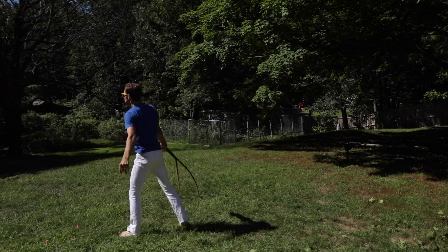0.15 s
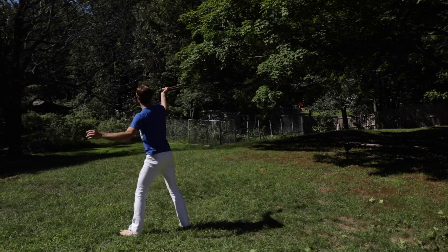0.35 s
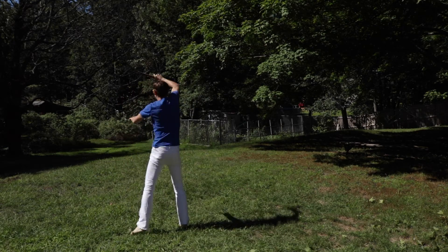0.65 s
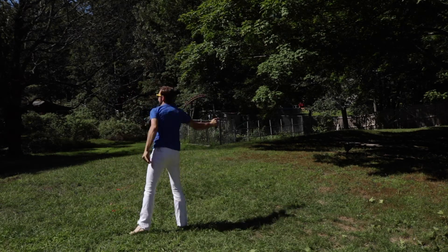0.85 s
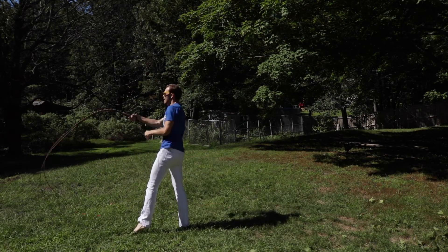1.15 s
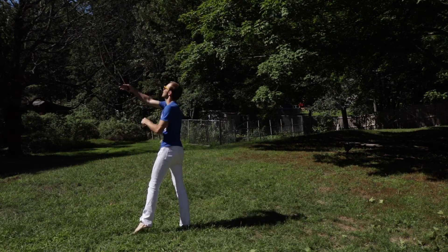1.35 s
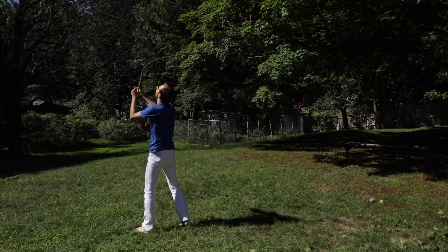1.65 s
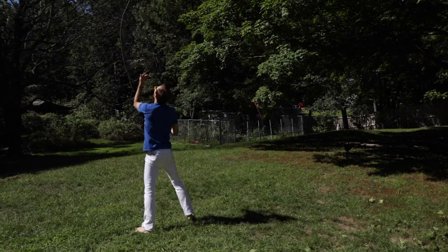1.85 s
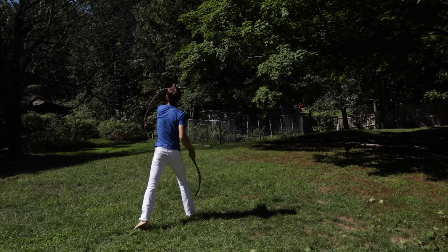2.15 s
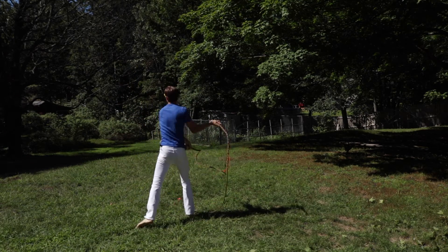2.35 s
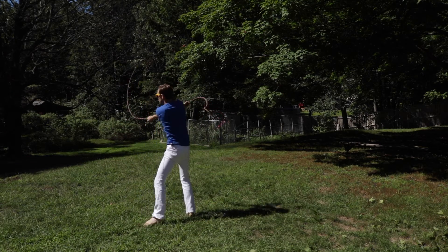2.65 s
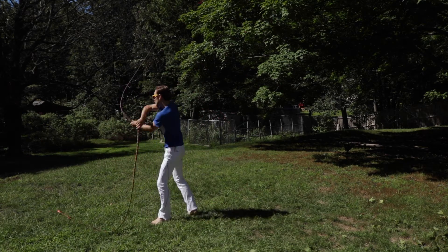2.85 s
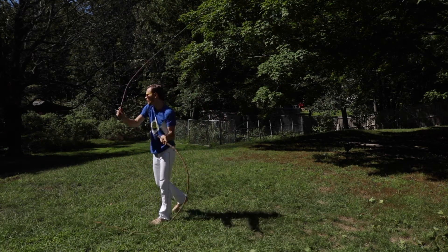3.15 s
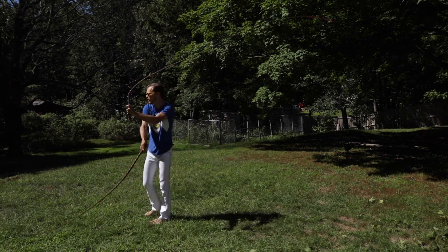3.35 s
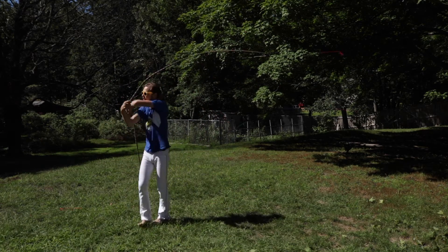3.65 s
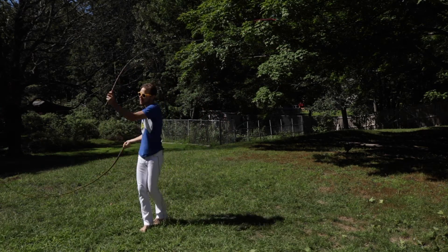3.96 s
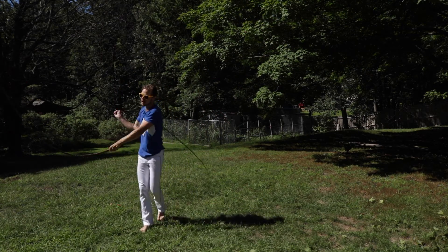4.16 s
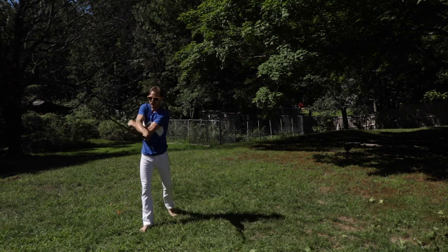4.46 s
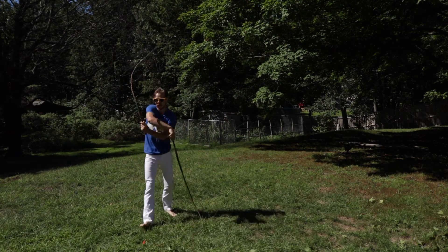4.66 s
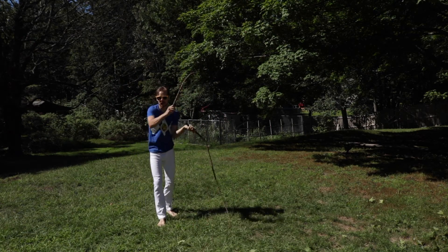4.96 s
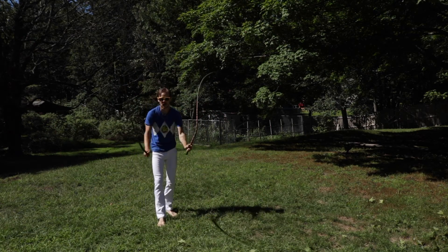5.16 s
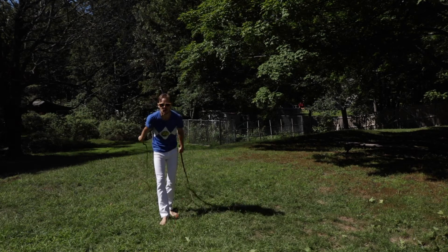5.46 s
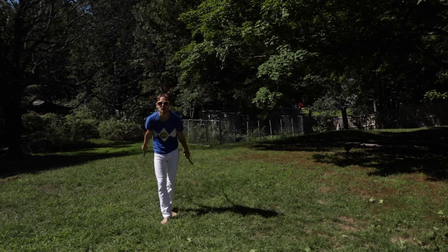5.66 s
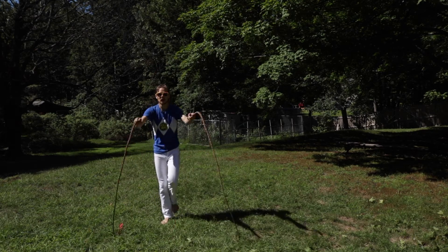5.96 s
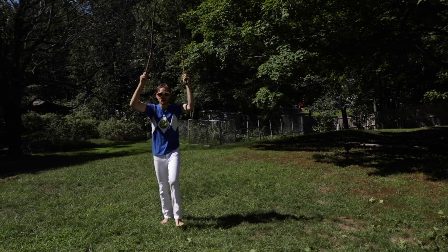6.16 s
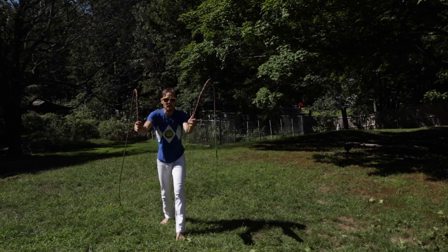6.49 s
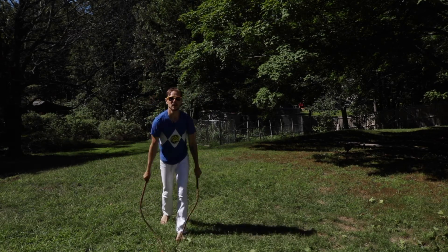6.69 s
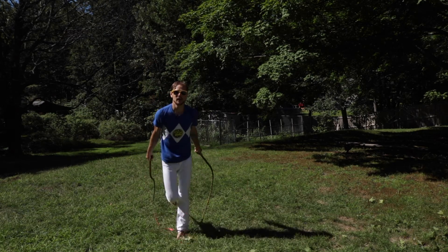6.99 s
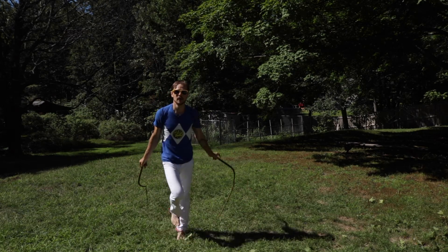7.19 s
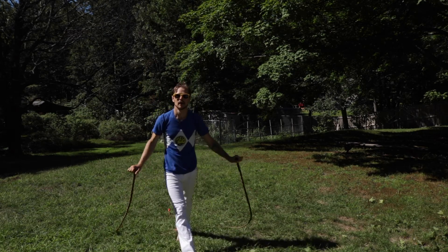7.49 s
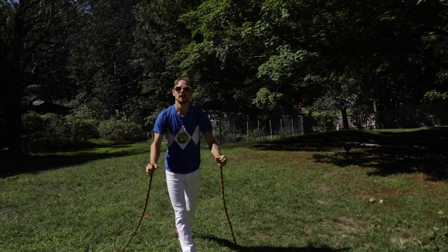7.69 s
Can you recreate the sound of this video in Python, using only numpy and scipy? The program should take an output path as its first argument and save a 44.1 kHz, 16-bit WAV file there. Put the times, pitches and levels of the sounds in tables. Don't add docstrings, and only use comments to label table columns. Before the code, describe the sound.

Outdoors on a grassy clearing edged with trees, faint distant traffic, a wavering low engine hum and thin insect hiss run throughout. At 0.0 s a leather whip cracks like a gunshot, overloading the microphone, with dense bright echoes scattering back from the wood. Faint whistling at 0.75 s leads to a second similar crack at 1.0 s, its roll fading over the next second. From 2.4 to 6.2 s the thongs give brief breathy, pitched swishes, with feet and leather rustling in grass. Dull thuds and snappy slaps fall at about 2.5, 2.8, 3.3, 3.4, 4.0, 4.3, 4.6 and 5.0 s; the sharpest pair is at 5.3 and 5.36 s, softer ones at 5.6 and 6.0. At 6.6 s comes the loudest crack, a weaker one right behind it, rolling through the trees. After 6.75 s bass vanishes and the thin echo fades to quiet field by 7.8 s.

```python
import sys
import numpy as np
from scipy import signal
from scipy.fft import rfft, irfft, next_fast_len
from scipy.io import wavfile
from scipy.ndimage import uniform_filter1d, map_coordinates

SR = 44100
rng = np.random.default_rng(int(sys.argv[2]) if len(sys.argv) > 2 else 0)


def wav_record(signal):
    frames = np.transpose(np.atleast_2d(signal))
    bounded = np.clip(frames, -1, 1)
    quanta = np.round(bounded * 32767).astype(np.int16)
    wavfile.write(sys.argv[1], SR, quanta)


def amplitude_ratio(level_db):
    exponent = np.asarray(level_db, float) / 20
    return 10 ** exponent


N = 345303


def unit(x):
    return x / np.sqrt(np.mean(x ** 2) + 1e-20)


def along(points, hz):
    point_hz, values = np.transpose(points)
    return np.interp(np.log(hz + 1), np.log(point_hz + 1), values)


def closed(points):
    first, last = points[0], points[-1]
    return [(first[0] / 4, first[1] - 40), *points, (last[0] * 2, last[1] - 40)]


def curve(points):
    s, values = np.transpose(points)
    return np.interp(np.arange(N) / SR, s, values)


def wobble(rate, size=N):
    knot_values = rng.standard_normal(int(size * rate / SR) + 4)
    return map_coordinates(knot_values, [np.arange(size) * rate / SR])


def filtered(x, response):
    m = next_fast_len(x.shape[-1] + 4096)
    return irfft(rfft(x, m) * response(np.fft.rfftfreq(m, 1 / SR)), m)[..., :x.shape[-1]]


def rush(spectrum, alike, patchy_db, size=N):
    pair = rng.standard_normal((2, size))
    if patchy_db is not None:
        z = signal.stft(pair, nperseg=256)[2]
        patches = uniform_filter1d(rng.standard_normal(z.shape[1:]), size=4, axis=0)
        patches = uniform_filter1d(patches, size=8, axis=1)
        pair = signal.istft(z * amplitude_ratio(patchy_db * unit(patches)), nperseg=256)[1][:, :size]

    def mid_side(hz):
        angle = np.arccos(np.clip(along(alike, hz), -1, 1)) / 2
        return amplitude_ratio(along(spectrum, hz)) * [np.cos(angle), np.sin(angle)]

    mid, side = filtered(pair, mid_side)
    return unit(np.array([mid + side, mid - side]))


def add(track, s, sound):
    i = round(s * SR)
    sound = sound[:, max(-i, 0):N - i]
    track[:, max(i, 0):][:, :sound.shape[1]] += sound


def dying(x, gain):
    hz, t, z = signal.stft(x, SR, nperseg=256)
    return signal.istft(z * gain(hz[:, None], t), SR, nperseg=256)[1][:, :x.shape[1]]


# (frequency [Hz], density [dB per Hz])
FIELD_COLOUR = [(15, -47), (25, -23), (69, -6), (410, -4), (522, -3.5), (1110, -3.5), (1570, -14.5),
                (1900, -17), (3920, -33), (7470, -23.5), (15400, -50)]
# (frequency [Hz], left-right likeness [-1 to 1])
FIELD_LIKENESS = [(60, 0.92), (180, 0.94), (550, 0.81), (1650, 0.31), (4970, -0.54), (15000, 0.12)]
# (time [s], level [dB])
TRAFFIC_LEVEL = [(0, -45), (2, -50), (3, -46.5), (6.5, -49), (7.2, -55), (7.83, -54.5)]
# (time [s], level [dB])
ENGINE_LEVEL = [(.9, -65), (1.3, -61), (1.63, -52.5), (1.8, -61), (2.51, -61.5), (2.79, -54), (3.71, -65),
                (3.99, -63), (5.43, -58.5), (6.42, -55.5), (6.9, -62.5)]
# (frequency [Hz], density [dB])
INSECT_BAND = [(6100, -27), (6500, -2), (7300, -1), (8100, -4.5), (8600, -31)]


def field():
    traffic_db = curve(TRAFFIC_LEVEL) + 0.38 * wobble(0.78)
    traffic = amplitude_ratio(traffic_db) * rush(FIELD_COLOUR, FIELD_LIKENESS, patchy_db=-1.87)
    phase = 2 * np.pi * np.cumsum(74 + 1.1 * wobble(1.0)) / SR
    engine = amplitude_ratio(curve(ENGINE_LEVEL) + 1.5 + 1.2 * wobble(4)) * np.sin(phase)
    insects = rush(closed(INSECT_BAND), [(7000, 0.017)], patchy_db=None)
    insects = amplitude_ratio(-57.5 + .8 * wobble(3.4)) * insects
    cricket = rush(closed([(4350, -16.5), (4560, 1.5), (4780, -13)]), [(4500, 0.19)], patchy_db=None)
    cricket = amplitude_ratio(-75 + 4.5 * wobble(9)) * cricket
    return traffic + engine + insects + cricket


# (time [s], level [dB])
GRASS_STIR = [(0, -74.5), (2.04, -78), (2.68, -68), (3.14, -64), (3.43, -66), (3.6, -59), (3.83, -77),
              (4.05, -72.5), (4.2, -66.5), (4.82, -62.5), (5.06, -71), (5.45, -67.5), (5.52, -55.5),
              (5.7, -80), (6.05, -69), (6.33, -77), (7.4, -76.5), (7.6, -71)]


def rustle():
    dry_db = curve(GRASS_STIR)
    soft_db = -53.5 + 0.35 * (dry_db + 68.5)
    grain = amplitude_ratio(1.1 * wobble(510) + 1.2 * wobble(25))
    dry_colour = closed([(4000, -5.0), (8000, 4.5), (12000, -4.5), (16000, -8.0)])
    soft_colour = closed([(1200, 8.0), (2200, 0), (5000, -7.0), (7000, -18.5)])
    dry = amplitude_ratio(dry_db + 6.0) * rush(dry_colour, [(1000, 0.082)], patchy_db=None)
    soft = amplitude_ratio(soft_db + 1.0) * rush(soft_colour, [(1000, 0.1)], patchy_db=-3.5)
    return grain * (dry + soft)


# (time [s], shock level [dB], wood echo level [dB], delay of first boughs [s], run-up [s])
CRACK_EVENTS = [
    (0.0164, 7, 3.5, 0.0175, 0.006),
    (0.9972, 6, 2.5, 0.01, .0041),
    (6.598, 16.5, 5, 0.017, 0.0093),
    (6.635, -7, -2.5, 0.012, .005),
]
# (frequency [Hz], density [dB per Hz])
WOOD_COLOUR = [(60, -45.5), (110, -22.5), (290, -26), (600, -10), (850, -11), (1300, -5.5), (2200, -1.5),
               (3200, 0.5), (4600, -2.5), (6200, -9.5), (9900, -14.5), (15400, -20)]
# (frequency [Hz], left-right likeness [-1 to 1])
WOOD_LIKENESS = [(60, 0.52), (180, 0.74), (550, 0.38), (1650, -0.083), (4970, -0.037), (15000, 0.18)]
# (frequency [Hz], decay by 60 dB [s])
NEAR_DECAY = [(100, 0.2), (300, 0.59), (700, 0.77), (1800, 0.71), (4800, 0.57), (9000, 0.46), (15000, 0.27)]
# (frequency [Hz], decay by 60 dB [s])
FAR_DECAY = [(200, 0.9), (1000, 2.27), (3000, 1.26), (8000, 0.58)]


def bump(v, centre, width):
    return np.exp(-((v - centre) / width) ** 2)


def shock_front(shock_db):
    u = np.arange(SR // 20) / SR / 0.00026
    pulse = (1 - u) * np.exp(-u)
    bounces = np.zeros((2, SR // 20))
    bounces[:, 0] = 0.11
    when = np.cumsum(rng.uniform(.0004, .0022, 14))
    signs = rng.choice([-1, 1], 14)
    for port in bounces:
        arrival = (SR * (when + rng.uniform(0, .0003, 14))).astype(int)
        port[arrival] = signs * amplitude_ratio(5.0 + rng.normal(0, 4.9, 14) - 60 * when / 0.046)
    pressure = signal.fftconvolve(bounces, pulse[None], axes=1)
    return amplitude_ratio(shock_db) * filtered(pressure, lambda hz: (1j * hz / (430 + 1j * hz)) ** 2)


def wood_gain(hz, v):
    high = hz ** 2 / (hz ** 2 + 1300 ** 2)
    treble_db = 6.5 * np.exp(-v / 0.049) - 3 * bump(v, 0.18, .08)
    bass_db = 7 * bump(v, 0.078, .03)
    focus_hz = 2600 + 2000 * np.exp(-v / .05)
    focus_db = 1.2 * (bump(np.log2((hz + 1) / focus_hz), 0, .8) - .5)
    near = amplitude_ratio(-60 * v / along(NEAR_DECAY, hz))
    far = amplitude_ratio(-18.5 - 60 * v / along(FAR_DECAY, hz))
    return amplitude_ratio(high * treble_db + (1.0 - high) * bass_db + focus_db) * np.hypot(near, far)


def wood_roll(wood_db, gap):
    t = np.arange(3 * SR // 2) / SR
    wood = dying(rush(WOOD_COLOUR, WOOD_LIKENESS, patchy_db=0.95, size=len(t)), wood_gain)
    onset = 0.22 + 0.65 / (1 + np.exp(-(t - gap) / 0.0003))
    level = amplitude_ratio(wood_db + 0.5 * wobble(35, len(t)))
    return level * onset * (1 - 0.31 * np.exp(-t / 0.087)) * wood


def tip_run_up(run_up):
    before = np.arange(SR // 10) / SR - .1
    colour = closed([(350, -1), (1200, -2.5), (3000, -6), (8000, -18)])
    hiss = rush(colour, [(300, 0.63), (3000, 0.21)], patchy_db=5.0, size=len(before))
    spurt = np.exp(-(before / (2 * run_up)) ** 4)
    approach = .12 * np.exp(before / (4 * run_up))
    return amplitude_ratio(-25) * (spurt + approach) * hiss


def cracks():
    out = np.zeros((2, N))
    for s, shock_db, wood_db, gap, run_up in CRACK_EVENTS:
        add(out, s - .1, tip_run_up(run_up))
        add(out, s, shock_front(shock_db))
        add(out, s, wood_roll(wood_db, gap))
    return out


# (time [s],
# peak level [dB], centre frequency [Hz], bandwidth [Hz], length [s])
ECHO_BURSTS = [(.012, -26, 900, 1200, .003), (.0195, -5, 1200, 2500, .0015),
               (6.6005, -5, 1500, 3000, .0015), (.033, -19, 600, 400, .002), (.036, -8, 4000, 1600, .002),
               (.049, -8, 4200, 1500, .003), (.073, -8, 4000, 1500, .0015), (.078, -8, 2900, 1200, .003),
               (.9908, -26, 3000, 1200, .0015), (.994, -27, 900, 700, .003), (1.001, -19, 480, 150, .005),
               (1.014, -7, 4300, 1800, .004), (1.033, -21, 500, 350, .004), (1.048, -18, 650, 450, .004),
               (1.063, -10, 2300, 1000, .003), (1.066, -19, 600, 500, .003), (1.077, -9, 2800, 1400, .003),
               (1.086, -12, 3300, 1500, .002), (6.584, -28, 500, 700, .002),
               (6.591, -25, 1500, 2000, .004), (6.606, -19, 90, 120, .008), (6.606, -16, 520, 200, .005),
               (6.613, -10, 700, 700, .003), (6.637, -6, 4200, 1600, .005), (6.652, -10, 1000, 900, .006),
               (6.662, -7, 2800, 1200, .004), (6.679, -9, 1400, 900, .003), (6.686, -6, 2800, 1200, .006),
               (6.697, -8, 2700, 1200, .003),
               (0.303, -43, 455, 500, 0.0082), (0.359, -36, 800, 1200, 0.0027),
                 (.36, -23, 2600, 4400, 0.0014), (0.051, -10.5, 650, 585, 0.005),
                 (0.098, -20.5, 600, 400, 0.006), (0.198, -23, 3500, 6000, 0.0015),
                 (6.708, -6, 2520, 2400, 0.0033), (6.802, -23, 3080, 4970, 0.0017),
                 (0.532, -40, 1530, 1500, 0.0098), (1.119, -25, 610, 398, 0.0054),
                 (1.226, -34, 950, 120, .012), (1.241, -32, 1070, 120, 0.012),
                 (1.438, -40, 1100, 800, 0.011), (1.507, -39, 1420, 900, .006),
                 (1.649, -38, 1000, 900, 0.0014), (7.127, -34, 2100, 2600, .012),
                 (7.285, -43, 1504, 1800, 0.018)]


def echoes():
    out, t = np.zeros((2, N)), np.arange(-2048, 2048) / SR
    for s, db, hz, width, length in ECHO_BURSTS:
        noise = rng.standard_normal(len(t)) + .5 * rng.standard_normal((2, len(t)))
        band = unit(filtered(noise, lambda f: 1 / (1 + ((f - hz) / width * 2) ** 4)))
        swell = np.exp(-(t / length) ** 2)
        strength = .9 * np.linalg.norm(swell) / np.linalg.norm(swell * band.mean(0))
        add(out, s + t[0], amplitude_ratio(db) * strength * swell * band)
    return out


# (start [s], length [s], first pitch [Hz], last pitch [Hz], level [dB])
THIN_SWEEPS = [(0.742, 0.04, 620, 800, -35), (.775, .04, 780, 690, -36), (.81, .06, 620, 610, -37),
               (2.653, 0.044, 890, 937, -44), (2.71, 0.045, 1130, 1000, -33), (2.755, .05, 980, 760, -37),
               (3.007, 0.16, 693, 685, -44.5), (3.045, 0.064, 444, 670, -39), (3.281, .016, 900, 900, -27),
               (3.3, .1, 850, 720, -40), (3.521, 0.06, 369, 800, -42), (3.565, 0.038, 978, 947, -34.5),
               (3.597, 0.039, 760, 672, -37), (4.164, 0.12, 539.6, 616, -38.5),
               (4.465, 0.035, 850, 840, -36), (4.819, 0.114, 680, 603, -40), (5.071, 0.26, 575, 583, -45.5),
               (5.2, .07, 700, 978, -37), (5.255, .1, 800, 790, -38), (6.047, 0.027, 1057, 1087, -38),
               (6.07, .03, 760, 820, -40), (6.1, 0.06, 780, 620, -39), (4.51, .07, 760, 640, -38),
               (5.14, .05, 570, 580, -41), (1.21, .036, 930, 990, -25)]
# (start [s], length [s], first pitch [Hz], last pitch [Hz], level [dB])
THICK_SWEEPS = [(.8, .13, 521, 521, -41.5), (2.6, .05, 600, 480, -46), (2.719, 0.067, 615, 676, -40.5),
                (3.093, 0.081, 607, 577, -46.5), (3.283, 0.13, 330, 500, -43), (3.662, .1, 555, 385, -46.5),
                (3.773, 0.084, 522, 560, -50), (3.977, 0.062, 296.5, 333, -43),
                (4.174, .09, 277.6, 495, -44), (4.469, 0.17, 401, 390, -43.5), (5.174, 0.15, 322, 493, -45),
                (5.998, 0.082, 405, 468, -47)]


def whistles():
    out = np.zeros((2, N))
    strands = ((1, -1.5, 90, 0.0012), (.75, -13, 220, 0.00085), (1.1, -14, 600, 0.071))
    for start, length, first_hz, last_hz, db in THIN_SWEEPS + THICK_SWEEPS:
        for ratio, level_db, fuzz, skirt in strands:
            size = round((length + 2 * skirt) * SR)
            hz = np.interp(np.arange(size) / SR, [skirt, skirt + length], [first_hz, last_hz])
            speed_db = 7 * np.log2(hz / hz.mean())
            fade = signal.windows.tukey(size, np.clip(0.5 + 10 * skirt, 0, 1))
            stretch = 1 + .03 * wobble(30, size)
            phase = 2 * np.pi * np.cumsum(ratio * hz * stretch) / SR
            shed = []
            for _ in range(3):
                tone = wobble(fuzz, size) * np.cos(phase) + wobble(fuzz, size) * np.sin(phase)
                shed.append(unit(tone))
            if ratio == 1:
                lumps = amplitude_ratio(2.5 * wobble(fuzz, size))
                shed[0] = unit(lumps * np.cos(phase + .5 * wobble(fuzz, size)))
            pair = np.array([shed[0] + 0.36 * shed[1], shed[0] + 0.3 * shed[2]])
            add(out, start - skirt, fade * amplitude_ratio(db + level_db + speed_db) * pair)
    return out


# (time [s], peak level [dB], frequency [Hz], decay by 60 dB [s])
BODY_THUDS = [(1.6556, -20, 800, .01), (2.8032, -28, 500, .012), (3.401, -25, 236, 0.055),
              (4.016, -31, 203, 0.043), (4.594, -29, 447, 0.048), (4.959, -27, 273, 0.042),
              (5.363, -17, 260, 0.037)]
# (time [s], peak level [dB], frequency [Hz], decay by 60 dB [s])
KNOT_RINGS = [(2.5053, -26, 1890, 0.009), (3.2924, -23, 1194, 0.009), (4.0232, -16.5, 1450, 0.0074),
              (4.2715, -15, 1300, 0.0071), (4.5929, -33, 1620, 0.01), (4.9555, -21.5, 1750, 0.01),
              (5.29, -7, 2470, 0.0069), (5.364, -10, 1542, 0.0075), (5.62, -29, 2540, 0.011),
              (5.9941, -32, 1690, 0.008)]


def knots():
    out, t = np.zeros((2, N)), np.arange(4096) / SR
    bright_tick = (5.2904, -7, 8080, 0.0044)
    for s, db, hz, t60 in KNOT_RINGS + BODY_THUDS + [bright_tick]:
        lag = rng.uniform(0, .00015, (2, 1))
        attack = 1 - np.exp(-t * hz * 2)
        add(out, s + 0.0011, amplitude_ratio(db - 60 * t / t60) * np.sin(2 * np.pi * hz * (t + lag)) * attack)
    return out


# (time [s], peak level [dB], thump level [dB], sizzle level [dB], left-right [dB])
GRASS_DRAGS = [(2.4299, -46.5, -6.5, -17.5, -1.5), (2.4628, -44.5, 1, -19, -2.5),
               (2.6434, -45.5, 0, -16, -1), (3.0741, -39, 3.5, -3, 1.5), (3.5727, -36, 3, -11, 3.5),
               (4.499, -49, 10.5, -12.5, 5), (4.19, -47.5, -4, -6.5, -0.5), (5.1132, -38.5, -16.5, -11, -2),
               (5.23, -43, 2.5, -18.5, -2.5), (5.5162, -41, -16.5, -12, -1.5),
               (5.942, -38, -0.5, -14, -1.5), (6.0551, -35.5, -1, -15.5, 0.5), (6.53, -48, 5, -9.5, -0.5),
               (6.572, -40.5, 4.5, -10.5, 0.5)]
# (time [s], peak level [dB], thump level [dB], sizzle level [dB], left-right [dB])
THONG_SLAPS = [(2.5085, -40, 5.5, -34, -1.5), (2.8017, -36.5, 9, -1.5, 4.5), (3.6, -60, 0, -3, 0),
               (2.8145, -48, -5, 0, 3), (3.7615, -42, -8, -25, 0), (3.7602, -49.5, -5, -10.5, 0.5),
               (4.956, -20.5, -8, -12.5, -1.5), (5.2908, -20, -2, -7.5, 0), (5.331, -42, 9.5, -3, 0.5),
               (5.3645, -19.5, 2.5, -14.5, 0), (5.6195, -34, -30, -20.5, 14), (3.5474, -45, -9, 3, 1),
               (6.154, -52.5, -1, -21, -6)]
# (time [s], peak level [dB], thump level [dB], sizzle level [dB], left-right [dB])
CLOTH_SLAPS = [(3.635, -42, -8, 2, 4.5), (3.645, -48, -10, 1, 4), (3.662, -50, -10, 0, 3),
               (2.821, -46, 0, 0, 3), (6.014, -42, -5, -8, -1), (2.726, -41.5, 6, -26, 1),
               (3.2935, -31, 0.5, -24.5, -8), (3.4042, -27.5, -1, -2, 1.5), (4.0201, -34, 3.5, -3, 3.5),
               (5.9935, -28.5, -4.5, -9.5, -2), (4.2714, -29, -2, -2.5, 1), (4.5935, -26, -3, -11.5, -0.5),
               (4.6844, -42.5, -18.5, -9.5, -1.5), (5.6774, -50.5, -15, -2.5, -1.5)]
# (frequency [Hz], density [dB])
THUMP_COLOUR = [(130, -12), (250, -6.5), (900, -1), (1600, -9.5)]
# (frequency [Hz], density [dB])
SNAP_COLOUR = [(900, -3.5), (2000, 0.5), (4000, -5.5), (6500, -15.5)]
# (frequency [Hz], density [dB])
SIZZLE_COLOUR = [(3500, -12), (6000, 3), (11000, -1), (16000, -9.5)]


def slap(db, thump_db, sizzle_db, pan_db, spread, t):
    u = np.clip(t / spread + 0.76, 0, None)
    blow = u * np.exp(1 - u)
    settle = (t > 0) * (amplitude_ratio(-17.5 - 60 * t / 0.16) + amplitude_ratio(-15.5 - 60 * t / 0.45))
    grit = amplitude_ratio((1.5 + 2 * blow) * wobble(1500, len(t)))
    pan = np.array([[pan_db / 2], [-pan_db / 2]])
    # (colour, level [dB], left-right likeness, share of settling)
    layers = ((THUMP_COLOUR, thump_db - 3.5, .9, .4), (SNAP_COLOUR, -6, .6, .8),
              (SIZZLE_COLOUR, sizzle_db - 1.0, .4, 1.2))
    total = np.zeros((2, len(t)))
    for colour, level_db, alike, rest in layers:
        noise = grit * rush(closed(colour), [(1000, alike)], patchy_db=None, size=len(t))
        energy = np.sum((blow * noise) ** 2, axis=1, keepdims=True)
        strength = np.sqrt(np.sum(blow ** 2) / energy)
        total += amplitude_ratio(db + level_db + pan) * noise * (strength * blow + rest * settle)
    return total


def slaps():
    out, t = np.zeros((2, N)), np.arange(-512, 7168) / SR
    for rows, spread in ((GRASS_DRAGS, 0.011), (THONG_SLAPS, .0018), (CLOTH_SLAPS, .0033)):
        for s, db, thump_db, sizzle_db, pan_db in rows:
            add(out, s + t[0], slap(db, thump_db, sizzle_db, pan_db, spread, t))
    return out


def scene():
    left, right = field() + whistles()
    air = np.array([left, np.roll(right, 4)])
    return air + rustle() + cracks() + echoes() + knots() + slaps()


# (time [s], share of bass let through [0 to 1])
BASS_SHARE = [
    (0, .55),
    (.5, .85),
    (1.3, .95),
    (6.69, 1.0),
    (6.745, 0),
    (7.83, 0),
]


def wind_filter(x):
    thin = filtered(x, lambda hz: (hz / 200) ** 2.606 / (1 + (hz / 200) ** 2.592))
    kept = np.clip(curve(BASS_SHARE), 0, 1)
    return thin + kept * (x - thin)


def low_pass(x):
    return signal.sosfilt(signal.butter(12, 15450, fs=SR, output="sos"), x)


def record(dry):
    heard = filtered(dry, lambda hz: hz ** 2 / (hz ** 2 + 45 ** 2))
    mix = wind_filter(heard)
    mix = mix / (1 + np.abs(mix) ** 8) ** (1 / 8)
    return low_pass(mix)


dry = scene()
out = record(dry)
wav_record(out)
```